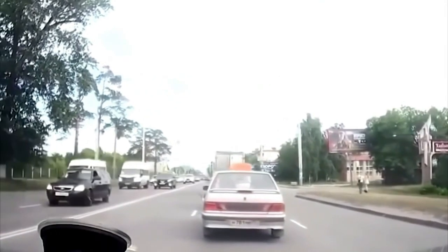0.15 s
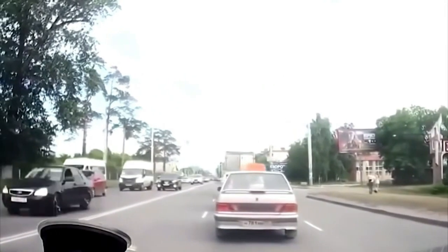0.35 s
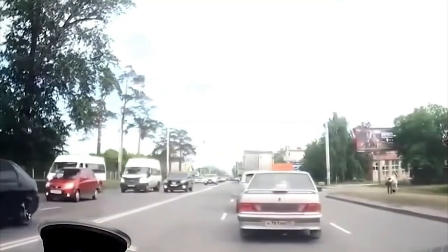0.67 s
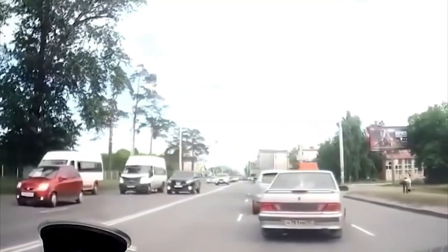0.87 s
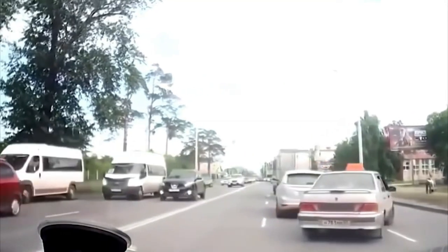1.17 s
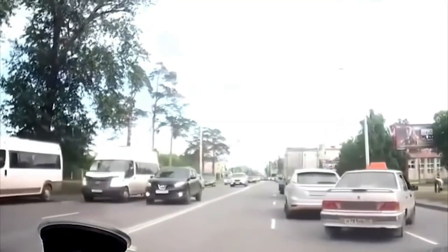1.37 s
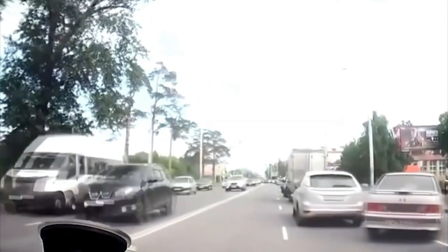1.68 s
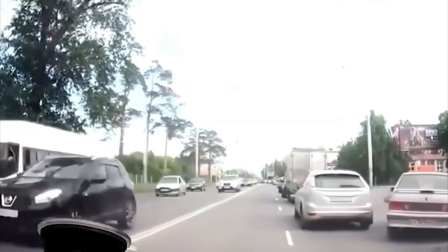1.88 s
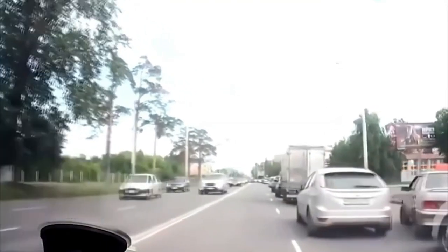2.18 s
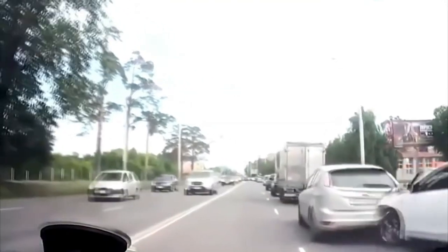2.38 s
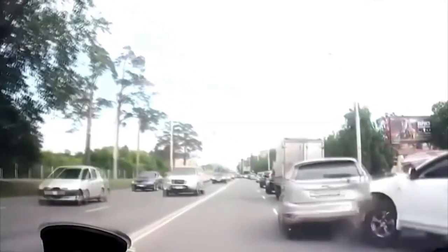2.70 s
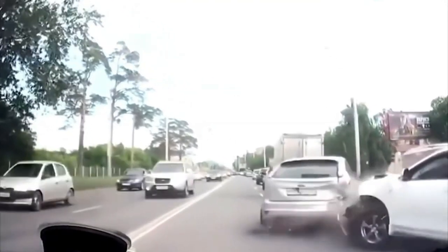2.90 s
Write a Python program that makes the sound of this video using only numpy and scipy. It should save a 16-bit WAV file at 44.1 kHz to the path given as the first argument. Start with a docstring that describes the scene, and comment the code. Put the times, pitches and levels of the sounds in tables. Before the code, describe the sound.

Crunching crash of two cars on a road, late in the scene, after muffled cabin rumble and broken tyre squeals; brief bright debris follows the impact, then a high squeal. Small, boxy dashboard microphone with little deep bass.

```python
"""Inside a moving car, heard by a small dashboard microphone: filtered-noise road roar, a ringing, fluttering
tyre boom, then short squeals of wavering tone. Tyres ahead scrub and squeal under braking, as coloured noise
with narrow noise strands, and an engine hum comes up. Two cars meet: splinters of bright noise, a crunching
bang of random cracks and the thud of decaying low tones. A last tyre squeal, part tone and part narrow noise,
holds on with an unsteady level."""
import sys
import numpy as np
from scipy import signal
from scipy.fft import rfft, irfft
from scipy.io import wavfile
from scipy.ndimage import uniform_filter1d

SR = 44100
rng = np.random.default_rng(int(sys.argv[2]) if len(sys.argv) > 2 else 0)


def generate_wav(signal):
    """Clip the signal to [-1, 1] and save it as 16-bit WAV at the path in sys.argv[1]."""
    frames = np.transpose(np.atleast_2d(signal))
    scaled = np.clip(frames, -1, 1) * 32767
    pcm = np.round(scaled).astype(np.int16)
    wavfile.write(sys.argv[1], SR, pcm)


N = 134505  # samples

# settings shared by the short squeals and the last one
SQUEAL_WAVER, SQUEAL_WAVER_HZ = .01, 90
SQUEAL_FLUTTER_HZ, SQUEAL_BLUR_HZ = 90.03, 110


def undb(db):
    """Decibels to an amplitude factor."""
    return 10 ** (np.asarray(db) / 20)


def unit(x):
    """Scale to rms 1."""
    return x / np.sqrt(np.mean(x ** 2))


def curve(table, column):
    """Column of a time table, joined by straight lines, one value per sample."""
    points = np.array(table)
    return np.interp(np.arange(N) / SR, points[:, 0], points[:, column])


def colour(x, table):
    """Filter with (Hz, dB) points; holds the first gain below them, drops to -120 dB above them."""
    points = np.array(table)
    hz = np.arange(N // 2 + 1) * SR / N + 1  # 1 Hz up, to keep the logarithm finite
    gain_db = np.interp(np.log(hz), np.log(points[:, 0]), points[:, 1], right=-120)
    return irfft(rfft(x) * undb(gain_db), N)


def walk(rate_hz):
    """Random levels held 1 / rate_hz seconds and slewed twice; rms 1."""
    hold = int(SR / rate_hz)
    steps = np.repeat(rng.standard_normal(N // hold + 1), hold)
    slewed = uniform_filter1d(uniform_filter1d(steps, hold), hold)
    return unit(slewed[:N])


def tone(hz):
    """Sine of rms 1 that follows a moving pitch."""
    return np.sqrt(2) * np.sin(2 * np.pi * np.cumsum(hz) / SR)


def narrow(hz, width_hz):
    """Noise around a moving pitch; two random walks at width_hz modulate its sine and cosine."""
    phase = 2 * np.pi * np.cumsum(hz) / SR
    return walk(width_hz) * np.sin(phase) + walk(width_hz) * np.cos(phase)


def by_band(x, lo_hz, hi_hz):
    """Scale so that the given band has rms 1."""
    band = signal.butter(4, [lo_hz, hi_hz], "band", fs=SR, output="sos")
    return x / np.std(signal.sosfilt(band, x))


def road_roar():
    """Broad noise in the cabin; the lower and upper parts swell and flicker on their own."""
    # cabin colour of the road noise: pitch_hz [Hz], gain_db [dB]
    cabin_colour = [(29, -81), (50, -71.5), (114, -27.5), (146, -16.5), (187, -11.5), (227, -9), (274, -5),
                    (302, -10.5), (372, -11), (442, -21.5), (556, -15), (670, -21), (727, -13),
                    (915, -15.5), (1220, -14.5), (1370, -19), (1500, -24), (1720, -31), (1970, -29),
                    (2290, -29), (2680, -28), (2900, -33.5), (3230, -38), (3910, -39.5), (4830, -64),
                    (5200, -95.5)]
    # swell of the roar: time_s [s], low_db at 330-900 Hz [dB], high_db at 3200-4600 Hz [dB], before flicker
    swell = [(0.02, -31.5, -49.5), (0.35, -29, -51), (0.61, -24.5, -48), (0.97, -28.5, -48.5),
             (1.29, -30.5, -48.5), (1.64, -32, -45), (1.87, -33.5, -51), (2.17, -32.5, -51.5),
             (2.67, -29.5, -45), (2.77, -31, -47.5), (2.91, -31, -47), (3.03, -33.5, -61)]
    roar = colour(rng.standard_normal(N), cabin_colour)
    low = signal.sosfiltfilt(signal.butter(3, 1236, fs=SR, output="sos"), roar)
    low_gain = undb(curve(swell, column=1) + 1.2 * walk(9))
    high_gain = undb(curve(swell, column=2) + 1.2 * walk(7))
    return by_band(low, 330, 900) * low_gain + by_band(roar - low, 3200, 4600) * high_gain


def tyre_boom():
    """Air in the tyres rings near one moving pitch and flutters loosely around another."""
    # clear ring: time_s [s], pitch_hz [Hz], level_db [dB]
    ring_course = [(0, 266, -29), (.2, 258, -25), (.3, 252, -17), (.4, 248, -16), (.435, 246, -23),
                   (.465, 243, -16), (.565, 237, -16), (.595, 237, -34), (.67, 238, -21), (.81, 236, -19),
                   (.84, 236, -30), (.87, 236, -21), (1.0, 236, -21), (1.04, 244, -30), (1.1, 250, -24),
                   (1.21, 248, -22), (1.25, 244, -29), (1.29, 243, -21), (1.38, 243, -30), (1.45, 243, -34)]
    # loose flutter: time_s [s], level_db [dB]
    flutter_course = [(0.02, -28.5), (0.04, -24.5), (0.39, -35), (0.82, -17), (0.85, -32.5), (1.0, -22.5),
                      (1.08, -32.5), (1.32, -17.5), (1.34, -28.5), (1.54, -29.5), (1.58, -19.5),
                      (1.64, -28), (2.43, -29), (2.68, -17.5), (2.75, -24), (3.03, -38.5)]
    clean = .97  # share of the ring's power in a pure tone
    t = np.arange(N) / SR
    hz = curve(ring_course, column=1)
    ring = np.sqrt(clean) * tone(hz) + np.sqrt(1 - clean) * narrow(hz, width_hz=25)
    fade = np.clip(1 - (t - ring_course[-1][0]) / 0.089, 0, 1)
    ring = ring * undb(curve(ring_course, column=2)) * fade
    flutter = narrow(np.full(N, 266.1), width_hz=130)
    return ring + flutter * undb(curve(flutter_course, column=1))


def short_squeals():
    """For a moment the rubber's slip locks to one wavering pitch, with a faint, blurred octave."""
    # start_s [s], length_s [s], mid_pitch_hz [Hz], glide [Hz per s], level_db before flutter [dB],
    # roughness [0-1, share of power that is blurred]
    squeals = [(0.482, 0.065, 730, -3.5, -27, .2), (1.0, 0.036, 983, -6, -26, 0.24),
               (1.195, 0.052, 975, 1.5, -30, .5), (1.26, 0.046, 1218, -1.5, -24.5, .4),
               (1.39, 0.13, 1359, 500, -26, 0.51), (1.458, 0.058, 2730, -1500, -35.5, 0.4),
               (1.53, 0.05, 1436, -1500, -21, 0), (1.688, 0.043, 1279, -1500, -24, .3),
               (1.739, .06, 1368, 2, -24, .4), (1.93, 0.046, 1127, 393.5, -25, .4),
               (2.156, 0.063, 1130, -300, -22, .2), (2.215, 0.11, 1090, 300.5, -18, .2),
               (2.355, .1, 1187, 0, -20.5, 0.37), (2.45, .06, 1320, -0.5, -23, .3),
               (2.385, 0.057, 831, 1002.5, -28, 0.37), (2.515, 0.084, 792, -6.5, -22.5, .3),
               (2.567, .05, 1010, -1500, -15, .15), (2.61, .06, 1300, 0, -19, .5),
               (2.715, 0.085, 1330, -500, -20, .5), (2.904, 0.03, 598, 9.5, -22, 0.3)]
    octave_db = -10
    t, out = np.arange(N) / SR, np.zeros(N)
    waver = 1 + SQUEAL_WAVER * walk(SQUEAL_WAVER_HZ)
    flutter = .9 + .3 * walk(SQUEAL_FLUTTER_HZ)
    blur = walk(SQUEAL_BLUR_HZ) + 1j * walk(SQUEAL_BLUR_HZ)
    for start_s, length_s, mid_hz, glide, level_db, rough in squeals:
        progress = np.clip((t - start_s) / length_s, 0, 1)
        hz = (mid_hz + glide * length_s * (progress - .5)) * waver
        turn = np.exp(2j * np.pi * np.cumsum(hz) / SR)
        slip = np.sqrt(2 - 2 * rough) + np.sqrt(rough) * blur
        voice = slip * turn + undb(octave_db) * blur * turn ** 2  # squaring doubles the pitch
        out += undb(level_db) * np.sin(np.pi * progress) * voice.imag
    return out * flutter


def skidding_tyres():
    """Rubber sticks and slips unevenly: a broad scrub with broken squealing strands."""
    # time_s [s], pitch_hz [Hz], level_db of the whole mix [dB], upper_gain_db [dB], upper_centre_hz [Hz]
    course = [(0.9, 1117, -30, -6, 2430), (0.95, 1143, -36, -3, 2545), (1.02, 1080, -37.5, -28, 2270),
              (1.07, 1131, -33.5, -10.5, 2240), (1.2, 1118, -26.5, -12.5, 2308),
              (1.43, 1259, -20.5, -18, 2358), (1.52, 1310, -36.5, 4, 2688), (1.55, 1398, -37, -1, 2517),
              (1.61, 1207, -28.5, -6.5, 2587), (1.76, 1314, -28, 2.5, 2656), (1.78, 1299, -26, -2.5, 2690),
              (1.96, 1195, -26, -12, 2544), (2.08, 1219, -25.5, -6, 2532), (2.3, 1104, -19.5, -7, 2254),
              (2.33, 1167, -25.5, -5.5, 2363), (2.38, 1193, -15, -11, 2393), (2.54, 1109, -22.5, -7, 2443),
              (2.58, 1070, -15, -16.5, 2310), (2.67, 1209, -17, -0.5, 2542), (2.79, 1261, -23.5, -14, 2315),
              (2.81, 1120, -29, -2, 2297), (3.03, 1144, -24, -2.5, 2158)]
    # colour of rubber scrubbing on the road: pitch_hz [Hz], gain_db [dB]
    scrub_colour = [(410, -45.5), (700, -29.5), (809, -9), (891, -12.5), (990, -4), (1190, -1), (1330, -3),
                    (1700, -23.5), (2160, -18.5), (2690, -16), (2910, -17.5), (3560, -22), (4800, -49),
                    (6240, -85.5), (10600, -120)]
    # squealing strands, one per tyre: pitch_ratio [times the pitch], level_db in the mix [dB]
    strands = [(.88, -12), (1.002, -10), (1.099, -9)]
    scrub = unit(colour(rng.standard_normal(N), scrub_colour))
    split = signal.butter(4, 2300, "high", fs=SR, output="sos")
    upper = signal.sosfiltfilt(split, scrub)
    lower = (scrub - upper) * undb(-2.5 + 1.2 * walk(13))
    band = narrow(curve(course, column=4), width_hz=900) * undb(-5.5 + 2 * walk(25))
    upper_lift_db = 2
    mix = lower + (upper * undb(upper_lift_db) + band) * undb(curve(course, column=3))
    for ratio, level_db in strands:
        hz = ratio * curve(course, column=1) * (1 + .025 * walk(14))
        patchy = undb(level_db + 2 * walk(20))
        mix = mix + narrow(hz, width_hz=110) * patchy
    fade_in = np.clip((np.arange(N) / SR - course[0][0]) / 0.15, 0, 1)
    return fade_in * undb(curve(course, column=2)) * mix


def engine_hum():
    """One slightly wandering tone comes up under braking and eases to 0.4 of its amplitude."""
    start_s, ease_s, ramp_s = 1.386, 2.8, 0.32  # the easing follows the same slope, down to 0.4
    t = np.arange(N) / SR
    rise = np.clip((t - start_s) / ramp_s, 0, 1)
    ease = np.clip(1 - (t - ease_s) / ramp_s, .4, 1)
    hz = 178.7 * (1 + .004 * walk(7.96))
    return rise * ease * undb(-35 + 1.3 * walk(9)) * tone(hz)


def splinter_spray():
    """Fine glass and plastic splinters as flickering noise; the top shows only at the height of the bang."""
    # colour of the splinters: pitch_hz [Hz], gain_db [dB]
    bits_colour = [(4500, -6), (5500, 2.5), (7000, 2.5), (7600, -1), (10300, -2.5)]
    # course of the spray: time_s [s], level_db [dB]
    course = [(2.54, -95), (2.58, -50), (2.602, -55), (2.652, -40), (2.704, -52.5), (2.834, -62),
              (2.848, -89), (2.9, -82)]
    bright_from_s, bright_until_s = 2.61, 2.7
    t = np.arange(N) / SR
    flickering = rng.standard_normal(N) * undb(1.6 * walk(130))
    bits = unit(colour(flickering, [(3500, -39.5), *bits_colour]))
    dull = signal.sosfiltfilt(signal.butter(8, 7300, fs=SR, output="sos"), bits)
    peak = np.clip(np.minimum(t - bright_from_s, bright_until_s - t) / 0.017, 0, 1)
    on = np.clip(np.minimum(t - course[0][0], course[-1][0] - t) / .01, 0, 1)
    return on * undb(curve(course, column=1)) * (dull + peak * (bits - dull))


def crunching_metal():
    """Each blow sets off a shower of cracks in the buckling panels."""
    # blows of the collision: start_s [s], level_db [dB], rise_s [s], hold_s [s], decay_t60_s [s],
    # treble_lift_db [dB]
    blows = [(2.551, -20, 0.021, .01, 0.68, -1.5), (2.607, -14.5, 0.02, .02, 0.33, 3.5),
             (2.646, -16.5, .015, 0.028, 0.24, 1.5), (2.711, -25, .01, .01, 0.32, 1),
             (2.762, -23.5, 0.01, 0.016, 0.64, 2), (2.91, -25, 0.0098, .012, 0.16, -10)]
    # crumpling metal heard through the cabin: pitch_hz [Hz], gain_db [dB]
    metal_colour = [(41, -61), (70, -48), (132, -10), (264, 0.5), (333, -10.5), (518, -10.5), (664, -12.5),
                    (739, -5), (930, -8.5), (1230, -25), (1400, -11), (1610, -20), (2460, -16), (3390, -25),
                    (3900, -25), (4830, -39.5), (6280, -57), (10600, -120)]
    cracks_per_s, crack_spread_db = 8000, 1.5
    t = np.arange(N) / SR
    strikes = rng.random(N) < cracks_per_s / SR
    strength = undb(-crack_spread_db * np.log(1 - rng.random(N)))
    cracks = strikes * strength * np.sign(rng.standard_normal(N))
    metal = unit(colour(cracks, metal_colour))
    bright = signal.sosfilt(signal.butter(2, 1800, "high", fs=SR, output="sos"), metal)
    body_power, bright_power = np.zeros(N), np.zeros(N)
    for start_s, level_db, rise_s, hold_s, t60_s, lift_db in blows:
        rise = np.clip((t - start_s) / rise_s, 0, 1)
        decaying_s = np.maximum(t - start_s - rise_s - hold_s, 0)
        power = rise ** 2 * undb(2 * level_db - 120 * decaying_s / t60_s)  # doubled dB: squared amplitude
        body_power += power
        bright_power += power * undb(2 * lift_db)
    return np.sqrt(body_power) * (metal - bright) + np.sqrt(bright_power) * bright


def panel_thuds():
    """Large panels ring low for a moment, as sines with a quick onset and exponential decay."""
    # start_s [s], pitch_hz [Hz], level_db of the sine's peak before decay [dB], decay_t60_s [s]
    panels = [(2.566, 248, -8.5, 0.18), (2.63, 263, -19, 0.11), (2.681, 269.5, -16, 0.26),
              (2.688, 347, -18, 0.094)]
    out = np.zeros(N)
    for start_s, hz, level_db, t60_s in panels:
        age_s = np.maximum(np.arange(N) / SR - start_s, 0)
        onset = np.clip(age_s / 0.0042, 0, 1)
        out += undb(level_db - 60 * age_s / t60_s) * onset * np.sin(2 * np.pi * hz * age_s)
    return out


def last_squeal():
    """One tyre squeals on after the bang with an unsteady level: a wavering tone mixed with narrow noise."""
    # time_s [s], pitch_hz [Hz], level_db before flutter and sway [dB]
    course = [(2.84, 2170, -40), (2.9, 2165, -28), (2.96, 2155, -28), (2.985, 2150, -23), (3.01, 2150, -24),
              (3.05, 2140, -27)]
    rough = .22  # share of power in the noise
    t = np.arange(N) / SR
    waver = 1 + SQUEAL_WAVER * walk(SQUEAL_WAVER_HZ)
    flutter = .9 + .3 * walk(SQUEAL_FLUTTER_HZ)
    fade_in = np.clip((t - course[0][0]) / 0.024, 0, 1)
    level_sway = undb(2 * walk(60))
    hz = curve(course, column=1) * np.sqrt(waver)  # half the waver of the short squeals
    voice = np.sqrt(1 - rough) * tone(hz) + np.sqrt(rough) * narrow(hz, 2 * SQUEAL_BLUR_HZ)
    return fade_in * level_sway * undb(curve(course, column=2)) * voice * flutter


def scene():
    """Road, tyres and engine pass a steep treble cut; the collision and a faint hiss are added to them."""
    driving = road_roar() + tyre_boom() + engine_hum()
    tyres = short_squeals() + skidding_tyres() + last_squeal()
    cabin_cut = signal.ellip(6, .5, 50, 4900, fs=SR, output="sos")
    cabin = signal.sosfilt(cabin_cut, driving + tyres)
    collision = splinter_spray() + crunching_metal() + panel_thuds()
    hiss = undb(-84) * rng.standard_normal(N)
    return (cabin + collision + hiss)[None]


def record(dry):
    """The small microphone rounds the peaks, lacks deep bass and cuts the top."""
    drive = .9
    rounded = np.tanh(drive * dry) / drive
    thin = signal.sosfilt(signal.butter(5, 105, "high", fs=SR, output="sos"), rounded)
    return signal.sosfilt(signal.ellip(8, .2, 60, 10600, fs=SR, output="sos"), thin)


dry = scene()
out = record(dry)
generate_wav(out)
```